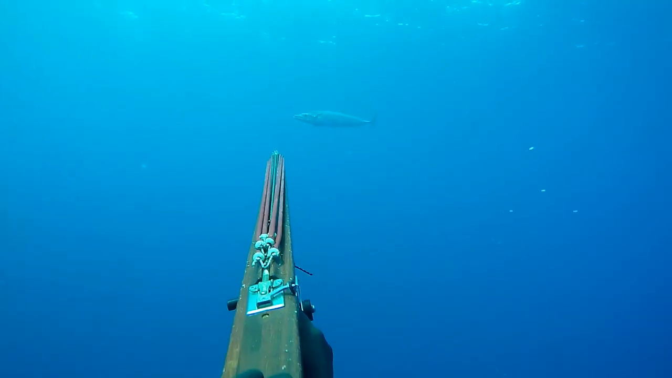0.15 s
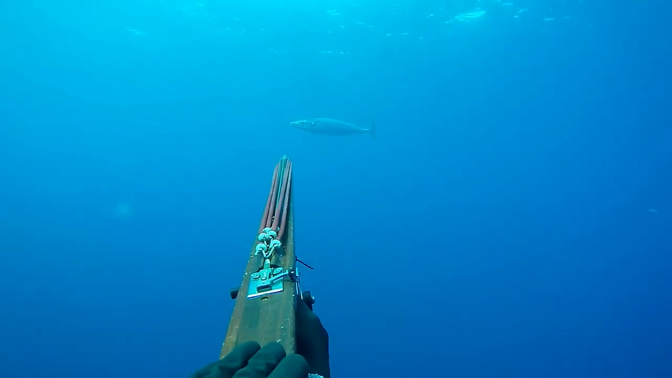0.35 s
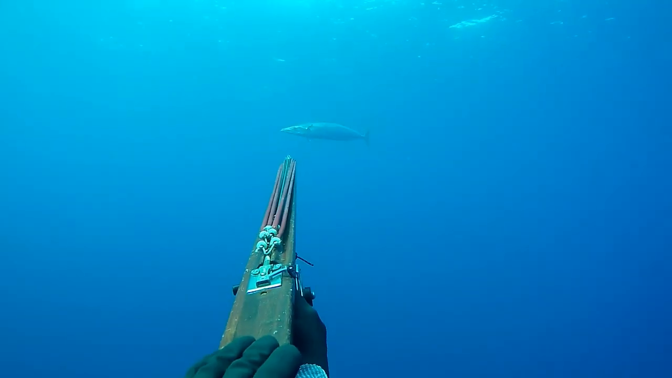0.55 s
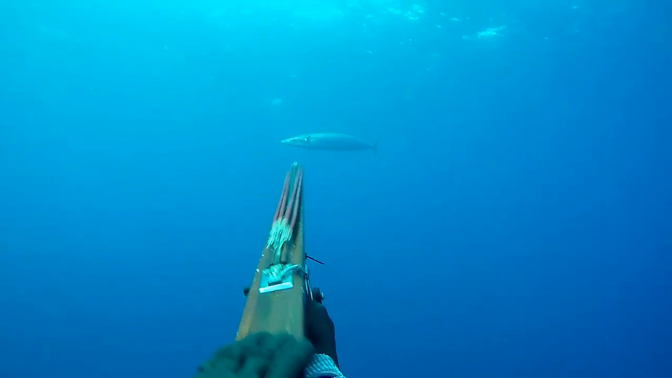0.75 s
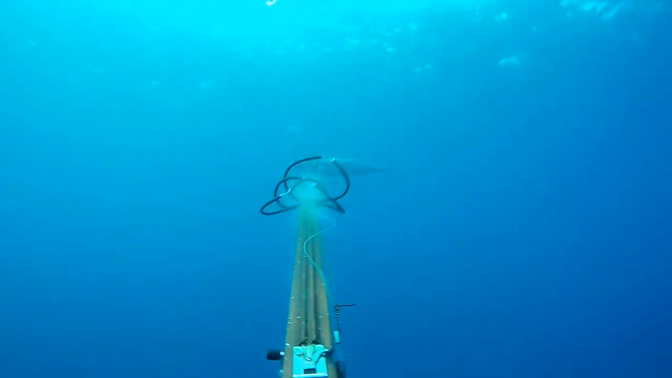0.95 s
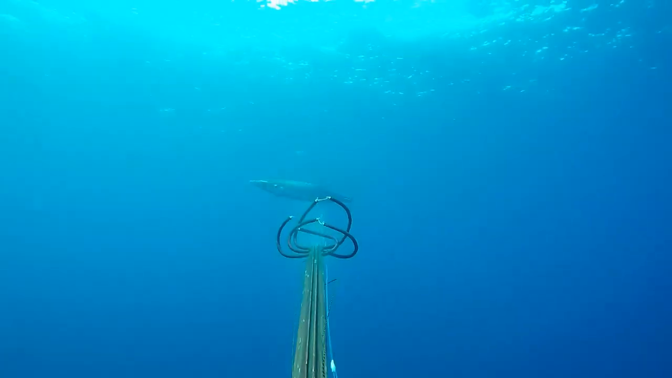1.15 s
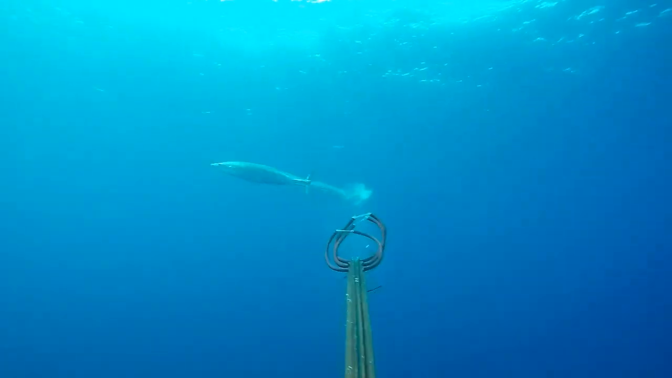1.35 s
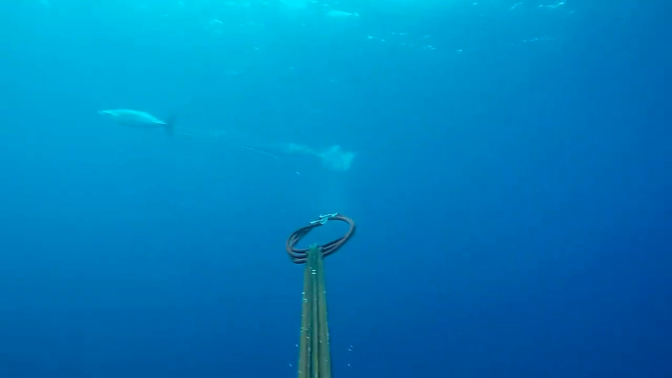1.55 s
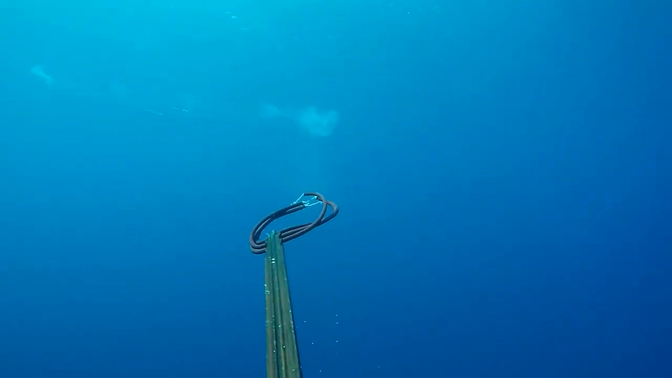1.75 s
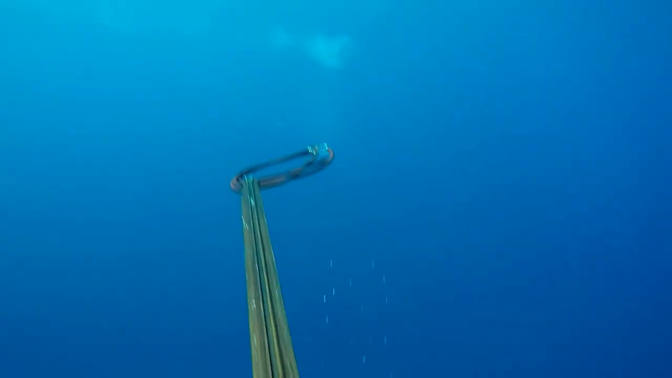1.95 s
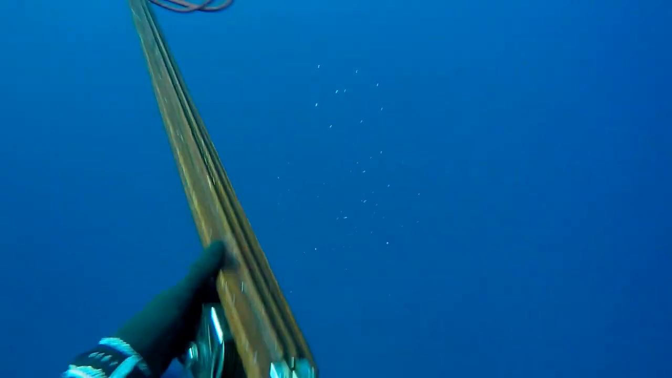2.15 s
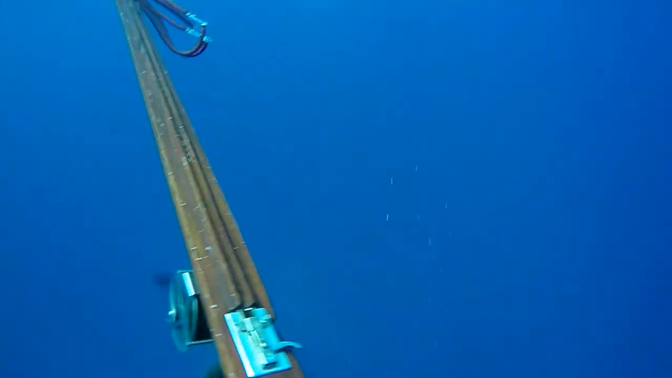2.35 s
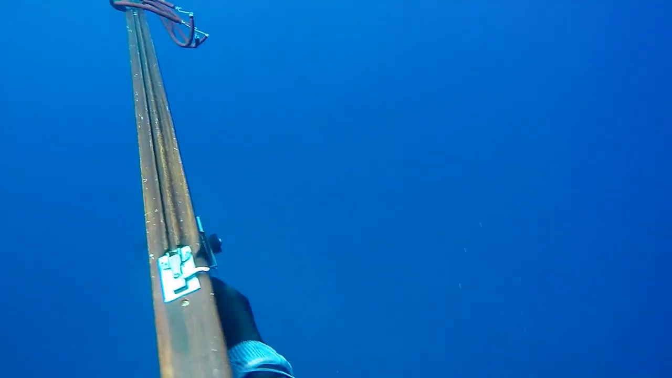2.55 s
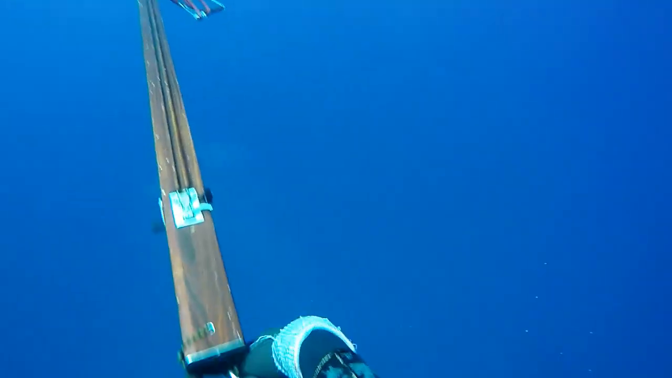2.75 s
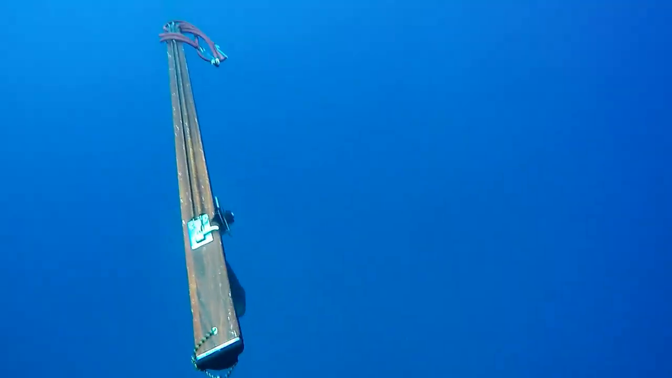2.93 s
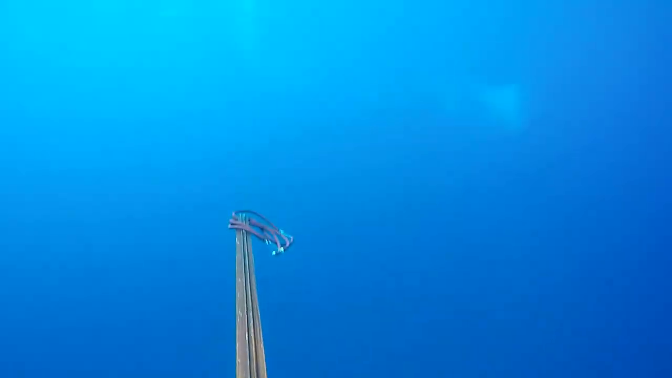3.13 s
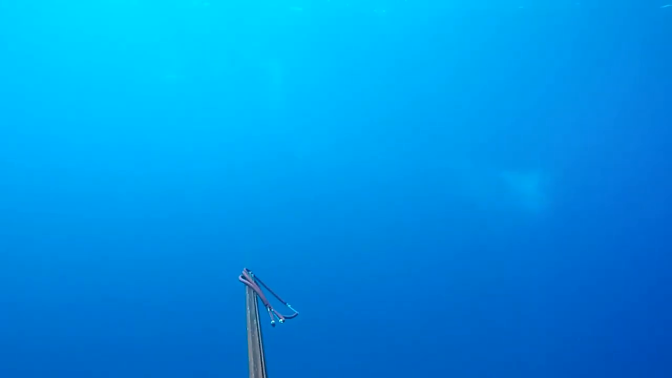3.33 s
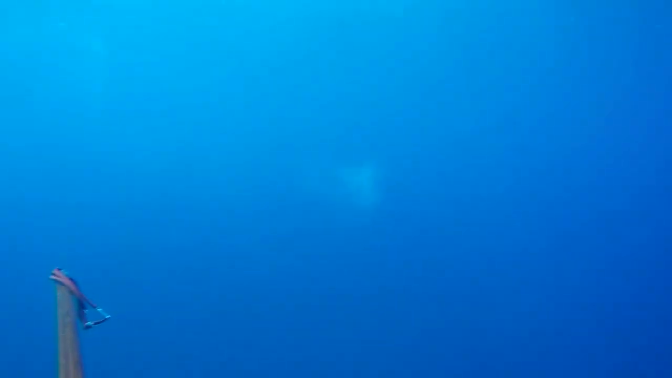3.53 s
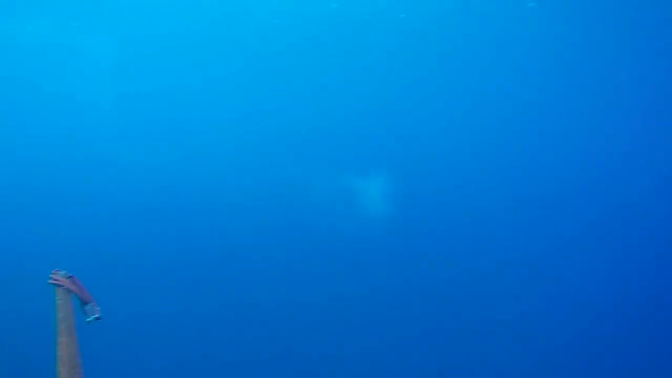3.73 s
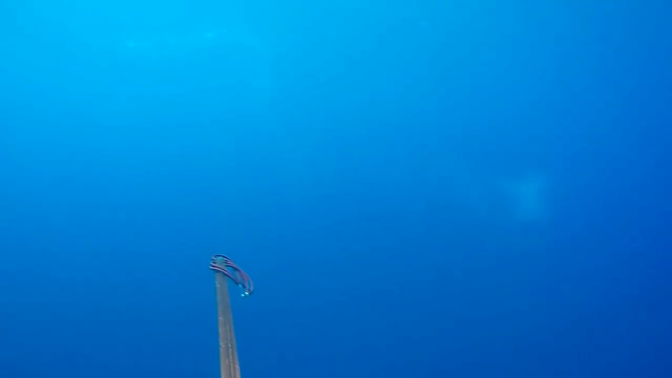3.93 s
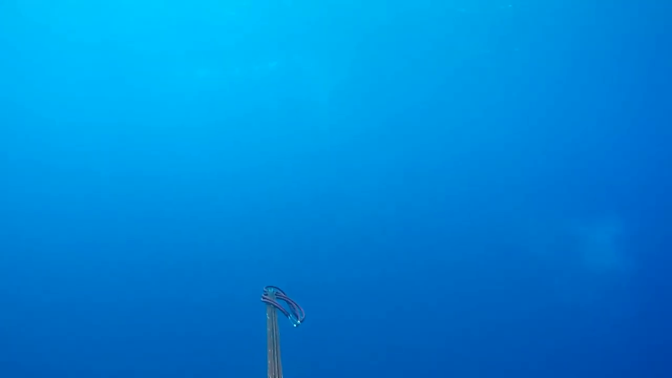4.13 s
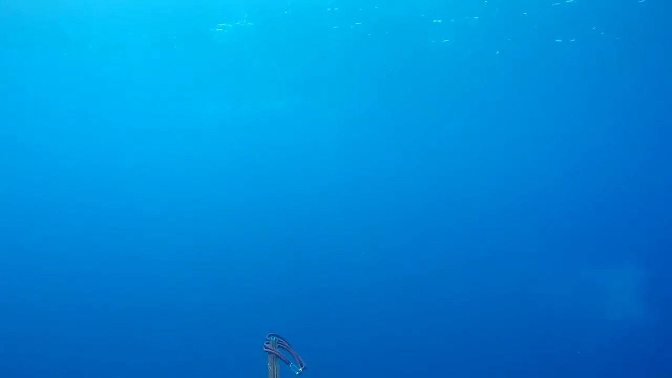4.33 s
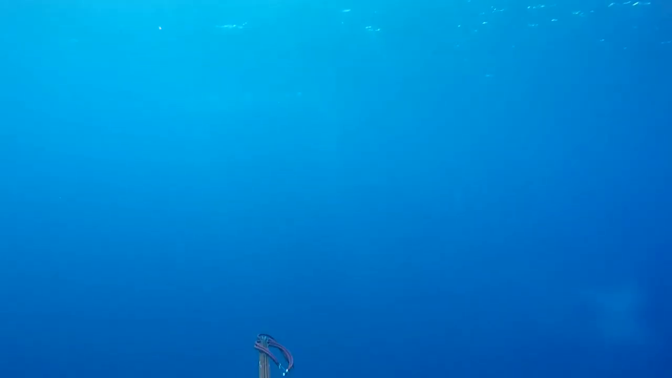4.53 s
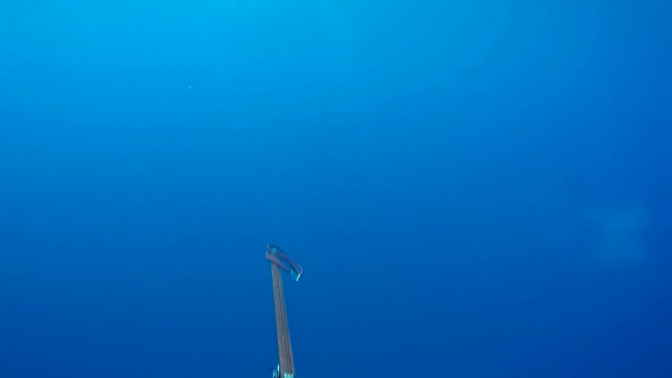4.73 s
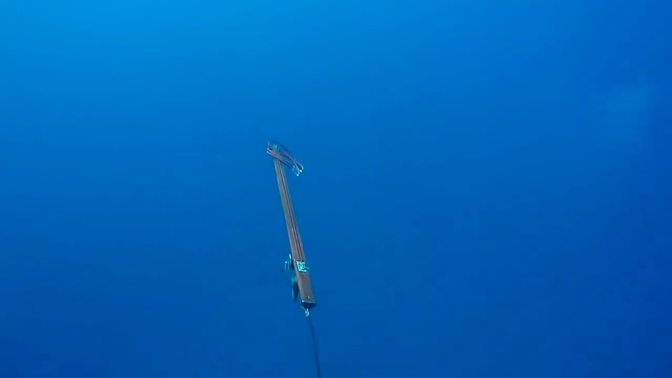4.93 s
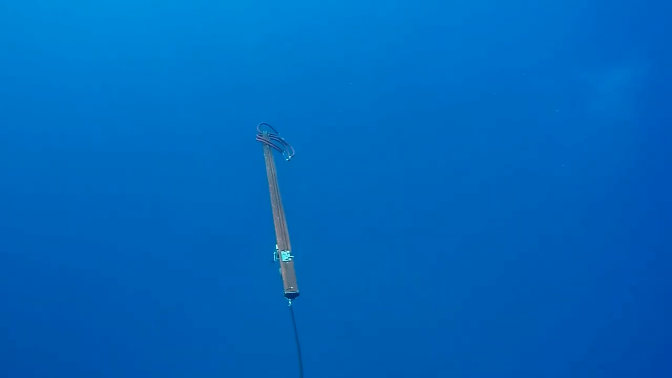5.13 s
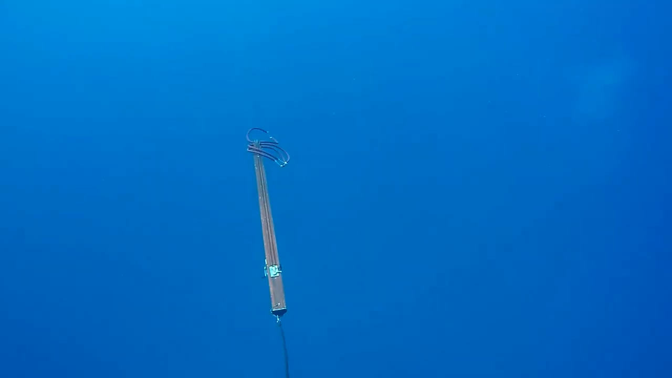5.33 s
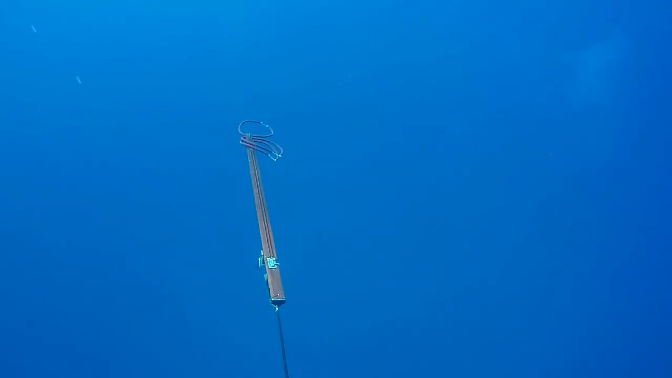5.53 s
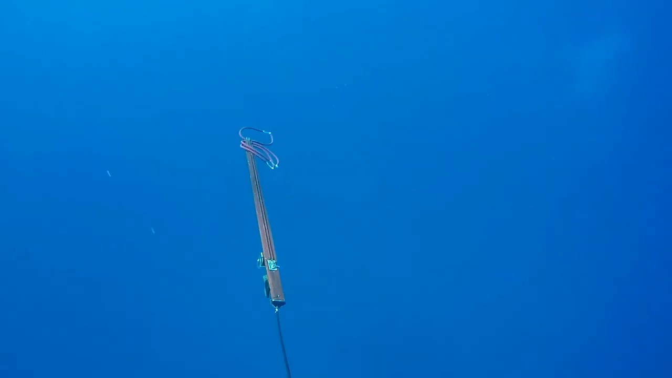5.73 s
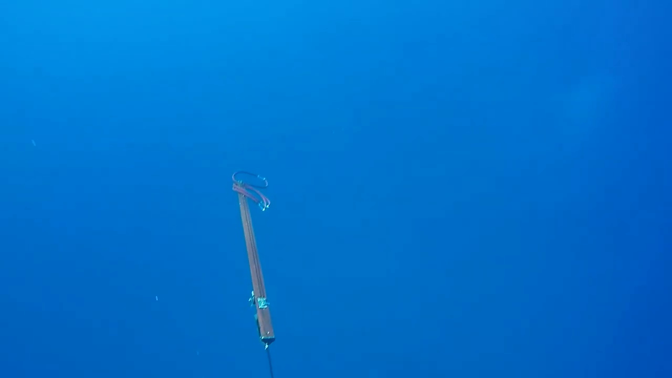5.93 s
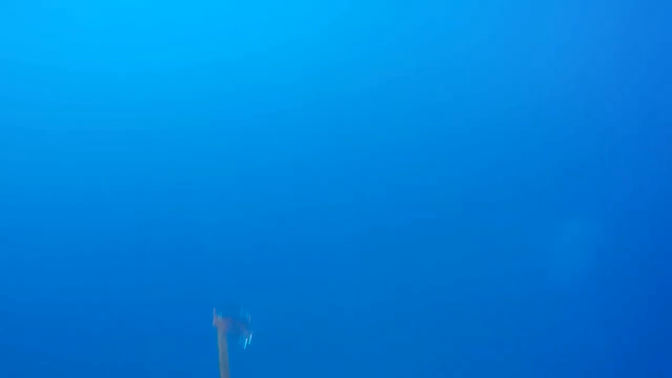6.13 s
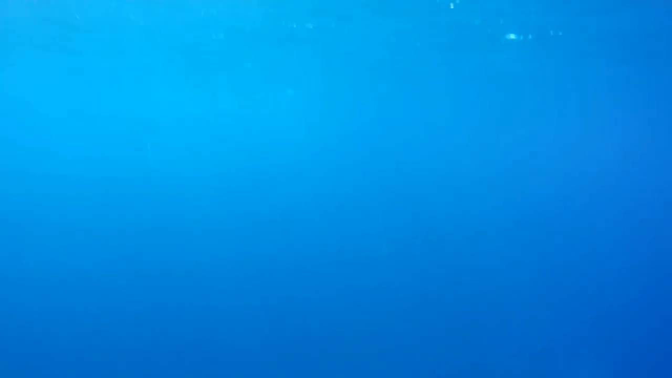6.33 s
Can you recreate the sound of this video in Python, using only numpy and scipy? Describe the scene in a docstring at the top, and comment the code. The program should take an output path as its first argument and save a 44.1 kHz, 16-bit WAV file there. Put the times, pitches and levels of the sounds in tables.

```python
"""A speargun fires under water, heard by a microphone in a sealed housing on the diver's head. Flow rumbles and
thumps on the housing all along, as filtered noise and squeezed low swings, with stray pings. At 0.8 s the shot
tears out a burst of rough noise and the gun's recoil gives a low swing; knocks ring the housing and slack gear
ticks and pings. From 1.5 s line rushes out as combed hiss, with bubbles, a throbbing hum, a whistle and knocks
on the stock. The rush dulls and weakens; after 4.25 s the whistle sits lower and fades, while knocks and thumps
go on."""
import sys
import numpy as np
from scipy import signal
from scipy.fft import rfft, irfft
from scipy.io import wavfile
from scipy.ndimage import uniform_filter1d, map_coordinates

SR = 44100
rng = np.random.default_rng(int(sys.argv[2]) if len(sys.argv) > 2 else 0)


def convert_level_to_amplitude(level_db):
    """Map a level in decibels to its linear amplitude factor."""
    exponent = np.asarray(level_db, float) / 20
    return 10 ** exponent


def master(y):
    """Save y as 16-bit WAV."""
    cut = np.clip(np.atleast_2d(y).T, -1, 1)
    pcm = np.round(cut * 32767)  # scale
    wavfile.write(sys.argv[1], SR, pcm.astype(np.int16))


N = 285768
TIME = np.arange(N) / SR

# water pushing on the housing: (time [s], surge level [dB])
SURGE_LEVELS = [(0, -35), (.22, -44), (.4, -39), (.68, -39.5), (.76, -28.5), (.81, -11), (.93, -15),
                (1.0, -27.5), (1.45, -27), (1.65, -21.5), (2.33, -19), (2.38, -28.5), (2.55, -23),
                (2.66, -29.5), (2.89, -22.5), (4.1, -24), (4.3, -28), (5.1, -22), (5.45, -32.5),
                (6.2, -24.5), (6.3, -28.5), (6.43, -15.5), (6.48, -20.5)]
# eddies that shake the housing harder for a moment: (middle [s], level [dB], length [s])
EDDY_BUFFETS = [(0.85, -21, 0.035), (1.822, -35.5, 0.26), (2.194, -16, 0.092), (2.529, -29, 0.096),
                (3.128, -29, 0.092), (3.4, -41, 0.18), (4.05, -38, 0.11), (5.0, -46.5, 0.14),
                (5.844, -39.5, 0.38), (6.138, -33, 0.095), (6.48, -35.5, 0.032)]
# tone of the faint open sea: (frequency [Hz], relative level per Hz [dB])
SEA_TONE = [(120, -29), (200, -4), (798, -9), (1110, -14), (2250, -8.5), (2900, -15), (3820, -6.5),
            (5200, -18), (6710, -12), (7350, -19.5), (15500, -25)]
# dull thumps against the housing, the first (0.816 s) being the gun's recoil at the shot: (middle [s], level of
# the swing [dB], pitch [Hz], length [s])
HOUSING_THUMPS = [(0.816, -2, 96, 0.01), (2.476, -17.5, 115, 0.015), (3.133, -20, 189, 0.034),
                  (3.231, -22, 123.0, 0.0049), (3.311, -32, 147, 0.0098), (3.423, -27, 116.0, 0.0029),
                  (4.07, -23.5, 159, 0.012), (4.196, -0.5, 101, 0.034), (4.449, -15, 148, 0.0079),
                  (4.564, -14.5, 112, 0.0079), (4.913, -11, 93.5, 0.016), (5.61, -24.5, 206, 0.0033),
                  (5.779, -1.5, 144.6, 0.01), (5.927, -22, 130, .015), (6.095, -6, 104, 0.0098)]
# a hollow that the flow sets humming: (time [s], pitch [Hz], level [dB])
HOLLOW_HUM = [(1.49, 698, -50.5), (1.6, 720, -35.5), (2.0, 750, -37), (2.4, 617.6, -55), (2.9, 756.2, -37),
              (4.5, 702.2, -46.5), (5.5, 647.7, -49), (5.62, 631, -41.5), (6.48, 619.4, -43.5)]
# line running out: (time [s], rush level [dB])
LINE_RUSH = [(1.495, -65), (1.53, -33.5), (1.75, -28), (2.2, -27.5), (2.33, -33.5), (2.55, -34),
             (2.62, -38), (2.75, -32.5), (3.25, -32.5), (4.25, -36.5), (5.0, -38.5), (5.15, -42),
             (5.5, -43), (6.0, -40), (6.48, -44)]
# a second, inverted path from the swinging gun: (time [s], first notch [Hz], strength [0-1])
GUN_MIRROR = [(2.35, 500, 0), (2.58, 500, .3), (2.63, 1050, .8), (2.83, 1600, .65), (3.5, 1710, .2),
              (6.48, 1550, .35)]
# tone of the housing: (frequency [Hz], relative level per Hz [dB])
HOUSING_TONE = [(300, -16.5), (800, -10), (1110, -13), (1390, -3), (1680, -6.5), (2170, 2.5), (2580, -14.5),
                (2770, -17), (2960, -15.5), (3500, -7), (4300, -17), (5300, -24.5), (5650, -31),
                (6200, -16.5), (7400, -35), (12900, -37), (15500, -54)]
# trapped air and small metal parts ringing: (time [s], level [dB], settled pitch [Hz])
GEAR_PINGS = [(.072, -41, 2150), (.69, -47, 2260), (.998, -33, 950), (1.076, -29, 2240),
              (1.077, -36.5, 1160), (1.13, -38, 1810), (1.209, -29.5, 906), (1.209, -39.5, 3570),
              (1.361, -39, 773), (1.423, -24, 1306), (1.966, -15, 4300), (1.974, -3, 1092),
              (1.976, -12, 3030), (2.026, -11, 2270), (2.024, -11, 1150), (2.037, -2.5, 1212),
              (2.037, -16, 7830), (2.584, -19, 1626), (5.606, -25, 600), (6.228, -33, 1080),
              (6.251, -36, 5060), (6.251, -35, 7560), (6.264, -22, 5020), (6.264, -30, 8960)]
# knocks on stock and reel: (time [s], peak [dB], early treble boost ahead of the housing [dB])
STOCK_KNOCKS = [(0.794, -29, 15), (0.812, 0, 23), (0.879, -28, 5), (0.918, -8.5, 14), (0.964, -13.5, 5),
                (0.976, -20, 6), (1.074, -29, 12), (1.269, -40, 4), (1.336, -39, 10), (1.48, -33, 10),
                (1.512, -24, -9), (1.587, -14.5, 3), (1.631, -1, -16), (1.656, -10.5, 22),
                (1.682, -8.5, -1), (1.702, -12, 10), (1.721, -12, -3), (1.74, -4, -15), (2.027, -11.5, -12),
                (2.038, -6.5, -5), (2.2387, 5.5, -5), (2.281, 2.5, -24), (2.317, -19, 19),
                (3.167, -13.5, -18), (3.243, -9, 2), (3.295, -14.5, 10), (3.755, -11, -8), (3.79, -14, -1),
                (3.826, -7, -3), (3.86, -6, -9), (6.228, -24, 1)]
# tearing bursts of the shot: (time [s], level [dB], rise [s], hold [s], fall [dB per s])
SHOT_TEARS = [(.808, -6, 0.0062, 0.0009, 3000), (.82, -12.5, 0.0083, 0.027, 800),
              (0.867, -27, 0.0043, 0.0075, 248), (0.928, -41, 0.019, 0.035, 900)]


def curve(rows):
    """Columns of a table as sample-rate curves."""
    s, *columns = np.transpose(rows)
    return [np.interp(TIME, s, c) for c in columns]


def unit(x):
    """Scale to rms 1."""
    return x / np.sqrt(np.mean(x ** 2))


def band(x, lo_hz, hi_hz, order=2):
    """Butterworth band-pass."""
    edges_hz = [lo_hz, min(hi_hz, SR / 2.1)]
    return signal.sosfilt(signal.butter(order, edges_hz, "bandpass", fs=SR, output="sos"), x)


def colour(x, points, size=2048):
    """Causal filter of unit energy with the given (Hz, dB) shape, from the folded cepstrum."""
    hz, db = np.transpose(points)
    bin_hz = np.arange(size // 2 + 1) * SR / size
    shape_db = np.interp(np.log(bin_hz + 1), np.log(hz), db)
    cepstrum = irfft(np.log(convert_level_to_amplitude(shape_db)))
    # folding the second half onto the first gives minimum phase
    cepstrum[1:size // 2] *= 2
    cepstrum[size // 2 + 1:] = 0
    response = irfft(np.exp(rfft(cepstrum)))
    return signal.oaconvolve(x, response / np.sqrt(np.sum(response ** 2)))[:len(x)]


def walk(rate):
    """Random levels held 1 / rate s and slewed twice; spread near 1."""
    hold = int(SR / rate)
    steps = np.repeat(rng.standard_normal(N // hold + 1), hold)
    return 2.06 * uniform_filter1d(uniform_filter1d(steps, hold), hold)[:N]


def add(out, s, piece):
    """Mix a piece in from time s."""
    i = max(int(s * SR), 0)
    out[i:i + len(piece)] += piece[:N - i]


def gritty(rate, spread_db):
    """Noise made uneven by a randomly wandering level."""
    return unit(rng.standard_normal(N) * convert_level_to_amplitude(spread_db * walk(rate)))


def crackle(rate, spread_db):
    """Lone ticks of either sign, a few much stronger than the rest."""
    strength = convert_level_to_amplitude(spread_db * np.minimum(rng.exponential(size=N), 4))
    ticks = (rng.random(N) < rate / SR) * strength
    return unit(ticks * rng.choice([-1, 1], N))


def drifting(hz, width_hz, rate, spread_db):
    """Narrow noise round a moving pitch: two slow noises on carriers a quarter cycle apart."""
    slow = [band(gritty(rate, spread_db), 1, width_hz, order=1) for _ in range(2)]
    phase = 2 * np.pi * np.cumsum(hz) / SR
    return unit(slow[0] * np.cos(phase) + slow[1] * np.sin(phase))


def water():
    """Slow surge and quicker flutter of flow round the housing, over a faint uneven sea."""
    flutter_under_surge_db, sea_db = -20.5, -60
    surge_db, = curve(SURGE_LEVELS)
    shake = convert_level_to_amplitude(surge_db + flutter_under_surge_db)
    for s, db, length in EDDY_BUFFETS:
        shake = shake + convert_level_to_amplitude(db) * np.exp(-((TIME - s) / length) ** 2)
    # rounding off the highest swings keeps the surge even and smooth
    swings = unit(band(band(rng.standard_normal(N), 17.3, 35.5, order=1), 13, 71.6))
    surge = band(unit(np.tanh(.5 * swings)), 9.6, 104)
    eddies = gritty(18, 3.0)
    flutter = unit(band(eddies, 64, 189.7) + band(eddies, 135.0, 156.7))
    sea = colour(gritty(60, 1.6), SEA_TONE)
    return convert_level_to_amplitude(surge_db) * surge + shake * flutter + convert_level_to_amplitude(sea_db) * sea


def thumps():
    """Soft pushes: a low swing that swells and fades, squeezed so that overtones appear."""
    out = np.zeros(N)
    for s, db, hz, length in HOUSING_THUMPS:
        t = np.arange(-2 * length, 2 * length, 1 / SR)
        swing = np.exp(-2.8 * (t / length) ** 2) * np.cos(2 * np.pi * hz * t)
        squeezed = swing + 0.3 * swing ** 2 - 0.21 * swing ** 3
        add(out, s - 2 * length, convert_level_to_amplitude(db) * squeezed)
    return out


def hollows():
    """Narrow noise round a drifting low hum, and a patchy wandering whistle in the line guide."""
    whistle_under_rush_db, bite_db, bite_s = -19, 10.5, 0.093  # louder as the line first bites
    drop_s, drop_db, fade_db_per_s = 4.25, -5, 14  # then it drops in pitch and fades
    throb_hz, throb_peak_s, throb_ends_s, throb_depth = 43.9, 1.7, 2.0, .9
    hum_hz, hum_db = curve(HOLLOW_HUM)
    start_s = HOLLOW_HUM[0][0]
    # the hum beats with the turning reel
    throb = 1 + throb_depth * (TIME < throb_ends_s) * np.cos(2 * np.pi * throb_hz * (TIME - throb_peak_s))
    hum = throb * drifting(hum_hz, 60, 40, 1.5)

    after = TIME > drop_s
    whistle_db = curve(LINE_RUSH)[0] + whistle_under_rush_db
    whistle_db = whistle_db + after * (drop_db - fade_db_per_s * (TIME - drop_s))
    whistle_db = whistle_db + bite_db * np.exp(-np.maximum(TIME - start_s, 0) / bite_s)
    whistle_hz = np.where(after, 5250, 6530) * (1 + .014 * walk(30))
    whistle = drifting(whistle_hz, 150, 90, 3.0)
    return (convert_level_to_amplitude(hum_db) * hum + convert_level_to_amplitude(whistle_db) * whistle) * (TIME > start_s)


def bubbles(count=260):
    """Air dragged down by the line breaks into short rising blips while the reel spins up."""
    out, t = np.zeros(N), np.arange(1500) / SR
    for when, pitch, draw in rng.random((count, 3)):
        hz = 550 * 4.0 ** pitch
        blip = np.sin(2 * np.pi * hz * (t + 7.9 * t ** 2)) * np.exp(-t * hz / 7.0)
        size = 1 / (draw + .12)  # many small, few large
        add(out, 1.56 + .75 * when, convert_level_to_amplitude(-37.5) * size * blip)
    return out


def rush():
    """Line and bubbles hiss through the housing; the mirrored path combs it with moving notches."""
    dull_under_rush_db, dull_lag_db, dull_lag_s = -6.5, -10, 0.19  # the dull part builds up late
    dull_fades_s, dull_fade_db = 5.2, -6.5
    bright_under_rush_db, bright_loss_db_per_s = -21, 2  # the gun drifts away
    rush_db, = curve(LINE_RUSH)
    since = np.maximum(TIME - LINE_RUSH[1][0], 0)
    dull_db = rush_db + dull_under_rush_db + dull_lag_db * np.exp(-since / dull_lag_s)
    dull_db = dull_db + dull_fade_db * (TIME > dull_fades_s)
    bright_db = rush_db + bright_under_rush_db - bright_loss_db_per_s * since

    notch_hz, strength = curve(GUN_MIRROR)
    hiss = colour(gritty(45, 0.59) + convert_level_to_amplitude(-7.0) * crackle(300, 6.7), HOUSING_TONE)
    # only the lower part of the hiss comes back off the narrow stock
    low = signal.filtfilt(*signal.butter(2, 4500, fs=SR), hiss)
    late = map_coordinates(low, [np.arange(N) - SR / notch_hz], order=1)
    hiss = hiss - np.clip(strength, 0, 1) * late

    # the dull part comes in bursts, strongest while the line jerks loose
    jerk_db = np.interp(TIME, [2.2, 2.6], [3.5, 1.0]) * walk(70)
    dull = convert_level_to_amplitude(dull_db + jerk_db) * unit(band(hiss, 217, 1156, order=3))
    middle = convert_level_to_amplitude(rush_db) * unit(band(hiss, 1260, 5270, order=3))
    parts = dull + middle
    # three broad treble resonances, each flickering alone
    for lo_hz, hi_hz, db in [(7700, 8900, -7), (9180, 10240, -3.5), (11000, 13500, -6.5)]:
        flicker_db = 2.0 * walk(70)
        parts = parts + convert_level_to_amplitude(bright_db + db + flicker_db) * unit(band(hiss, lo_hz, hi_hz))
    return parts * (TIME > LINE_RUSH[0][0])


def pings():
    """Single damped tones that start sharp and settle quickly; higher ones die sooner."""
    out, t = np.zeros(N), np.arange(8192) / SR
    for s, db, hz in GEAR_PINGS:
        t60 = .05 * (1000 / hz) ** 0.59  # seconds to fall 60 dB
        phase = 2 * np.pi * hz * (t + 0.2 * 0.0016 * (1 - np.exp(-t / 0.00036)))
        fade = np.exp(-np.log(1000) * t / t60) * np.minimum(t / 0.001, 1)
        add(out, s, convert_level_to_amplitude(db) * np.sin(phase) * fade)
    return out


def knocks(count=14):
    """A sharp blow plus a burst of rattle, ringing the housing; slack gear ticks faintly at random."""
    held_t60_s, let_go_s, free_t60_s = 0.021, 3.0, .011  # shorter once the gun is away from the diver
    loose_from_s, loose_to_s, loose_floor_db, loose_treble_db = 1.0, 1.47, -46, 6
    out, t = np.zeros(N), np.arange(4096) / SR
    loose = []
    for when, size in rng.random((count, 2)):
        s = loose_from_s + (loose_to_s - loose_from_s) * when
        loose.append((s, loose_floor_db + 8 * size, loose_treble_db))
    for s, db, treble_db in list(STOCK_KNOCKS) + loose:
        t60 = held_t60_s if s < let_go_s else free_t60_s
        noise = rng.standard_normal(len(t))
        rattle = noise * np.exp(-np.log(1000) * t / t60) * np.minimum(t / 0.001, 1)
        blow = rattle + 2.03 * np.exp(-t / .00005)
        treble = (convert_level_to_amplitude(treble_db) - 1) * band(blow, 4600, 12000, order=1) * np.exp(-t / 0.0064)
        blow = colour(blow + treble, HOUSING_TONE)
        add(out, s, convert_level_to_amplitude(db) * blow / np.max(np.abs(blow)))
    return out


def shot():
    """The released bands tear a rough fizz through the water, as bursts of noise in the housing."""
    wake_db, wake_ends_s = -65, 1.6  # faint fizz that stays behind the spear
    grit = gritty(300, 2.0)
    tear = grit + convert_level_to_amplitude(-1.0) * band(grit, 1690, 6700)
    tear = tear + convert_level_to_amplitude(5.5) * band(grit, 180, 1260) + convert_level_to_amplitude(3.5) * band(grit, 6220, 7000)
    size = convert_level_to_amplitude(wake_db) * (TIME > SHOT_TEARS[0][0]) * (TIME < wake_ends_s)
    for s, db, rise, hold, fall in SHOT_TEARS:
        swell = np.clip((TIME - s) / rise, 0, 1) ** 2
        falling_s = np.clip(TIME - s - rise - hold, 0, 1)
        size = size + swell * convert_level_to_amplitude(db - fall * falling_s)
    return size * colour(tear, HOUSING_TONE)


def scene():
    """Everything reaches one microphone through the housing wall."""
    background = water() + thumps()
    line = hollows() + bubbles() + rush()
    gun = pings() + knocks() + shot()
    return (background + line + gun)[None]


def low_pass(x):
    """Removes everything above the highest recorded frequency."""
    return signal.sosfilt(signal.butter(12, 15920, fs=SR, output="sos"), x)


def record(dry):
    """The input stage clips the loudest peaks and cuts the top."""
    top = signal.ellip(8, .2, 70, 15700, fs=SR, output="sos")
    clipped = np.clip(dry, -.95, .95)
    mix = np.clip(signal.sosfilt(top, clipped), -1, 1)
    return low_pass(mix)


dry = scene()
out = record(dry)
master(out)
```